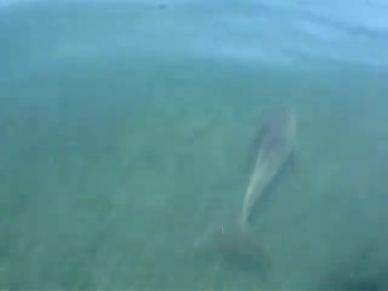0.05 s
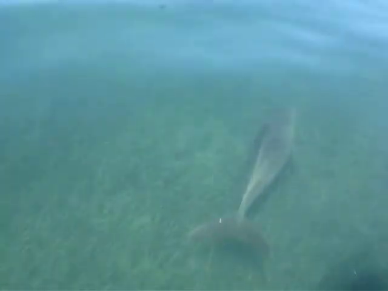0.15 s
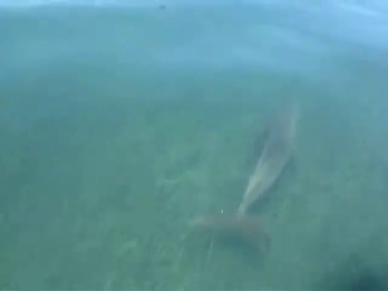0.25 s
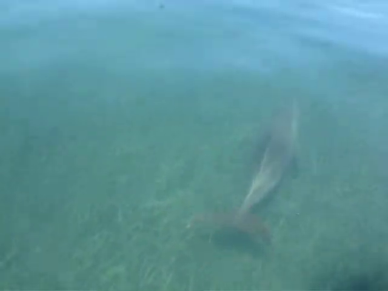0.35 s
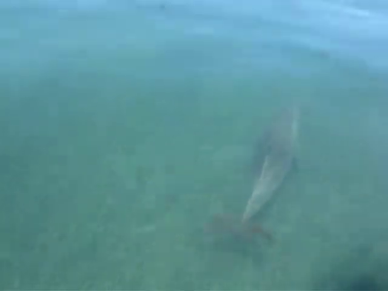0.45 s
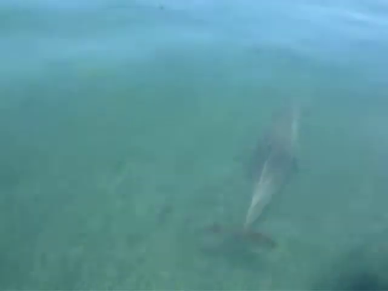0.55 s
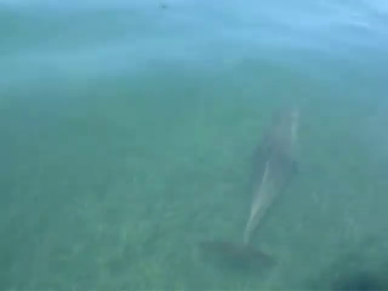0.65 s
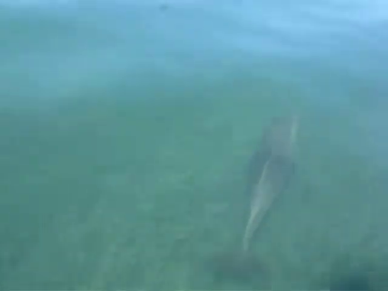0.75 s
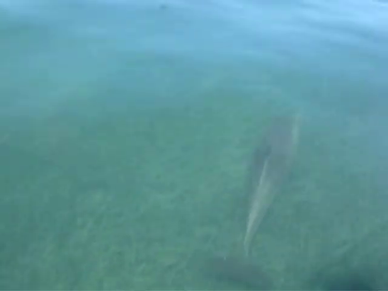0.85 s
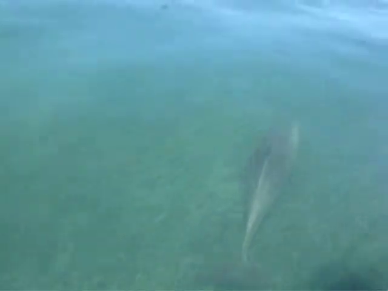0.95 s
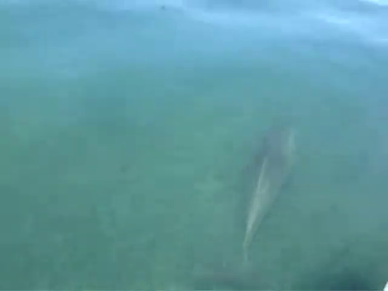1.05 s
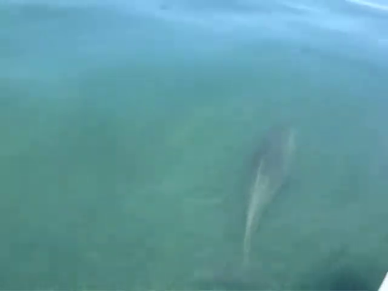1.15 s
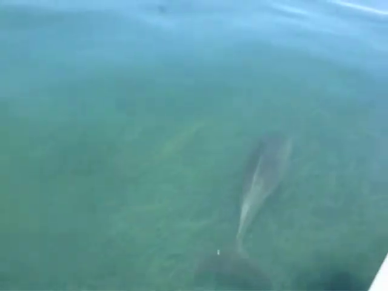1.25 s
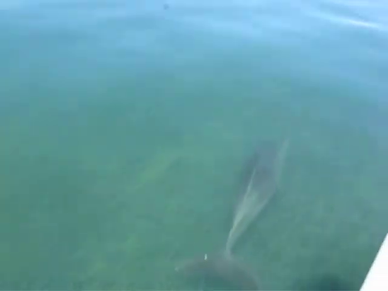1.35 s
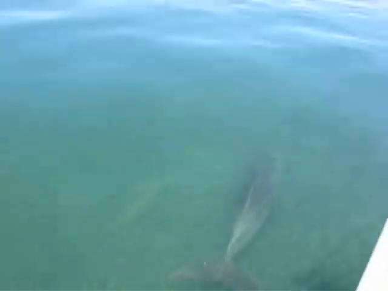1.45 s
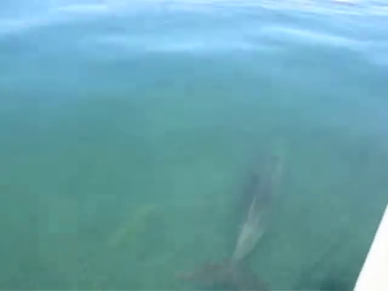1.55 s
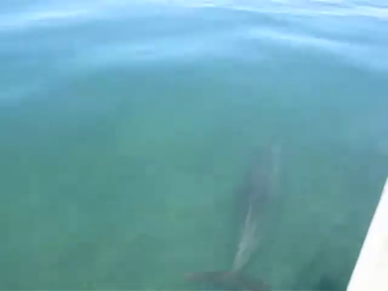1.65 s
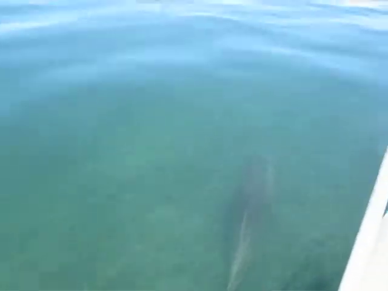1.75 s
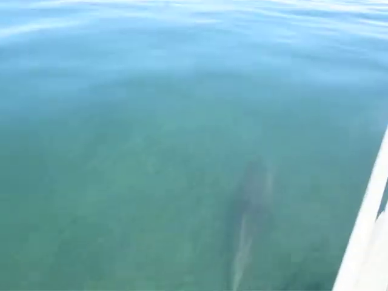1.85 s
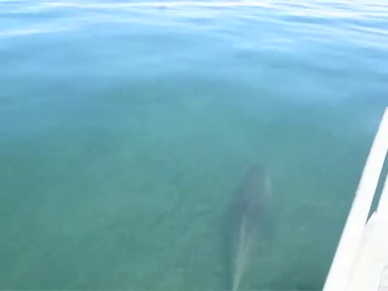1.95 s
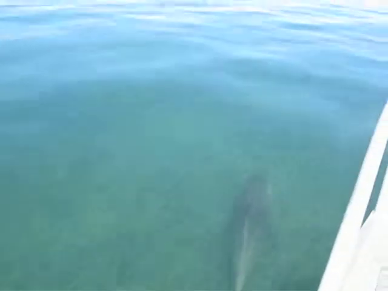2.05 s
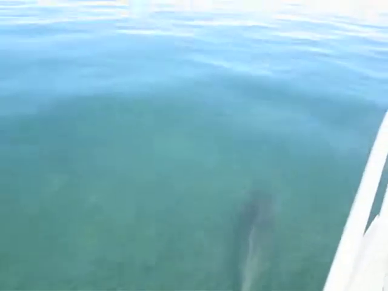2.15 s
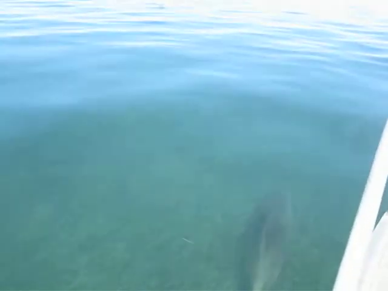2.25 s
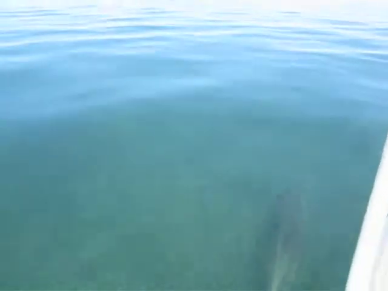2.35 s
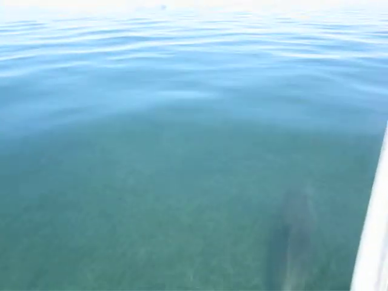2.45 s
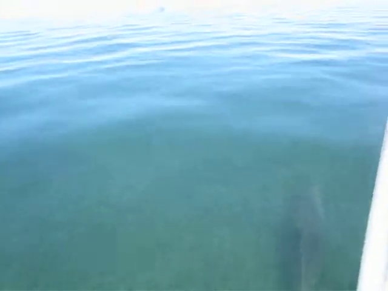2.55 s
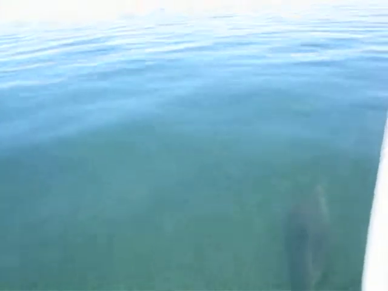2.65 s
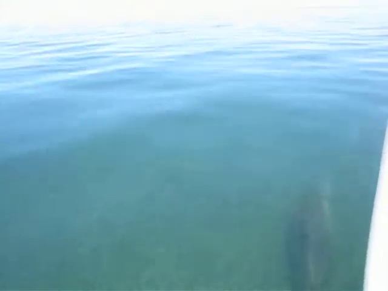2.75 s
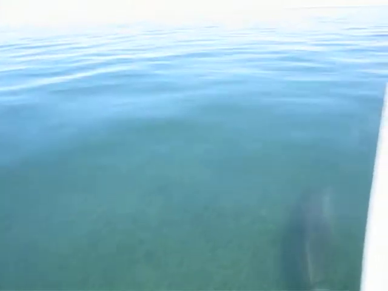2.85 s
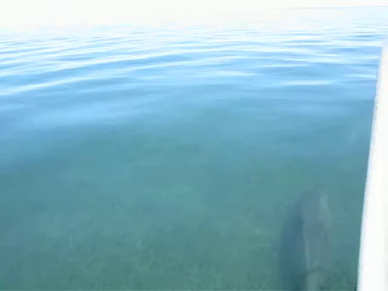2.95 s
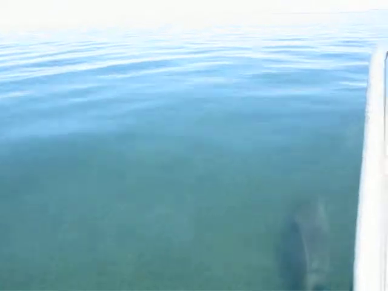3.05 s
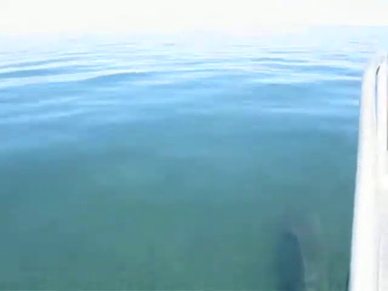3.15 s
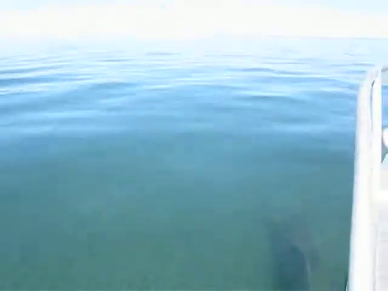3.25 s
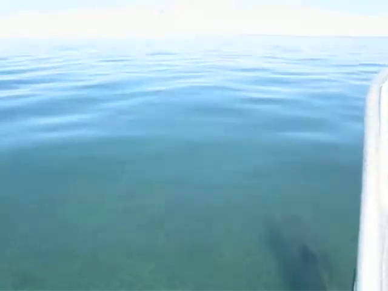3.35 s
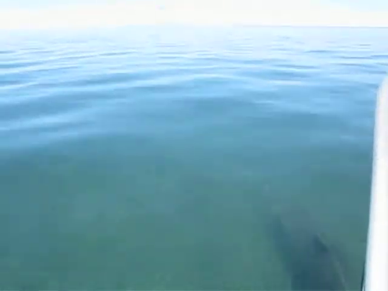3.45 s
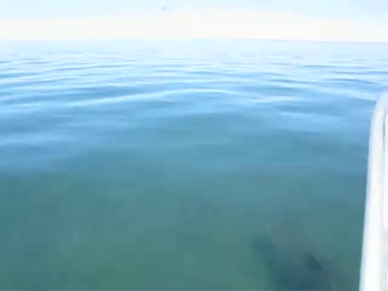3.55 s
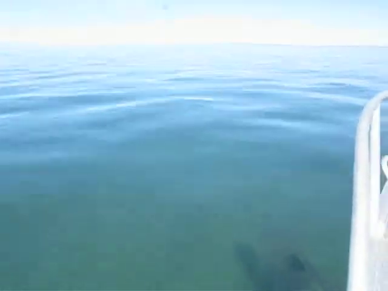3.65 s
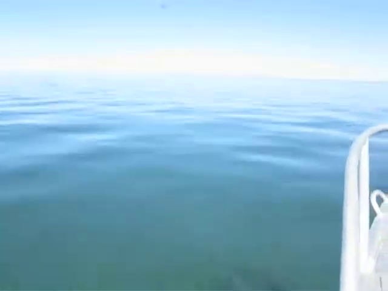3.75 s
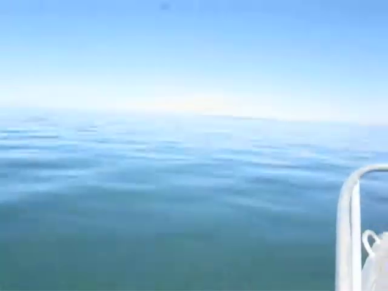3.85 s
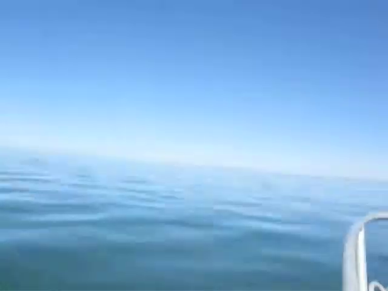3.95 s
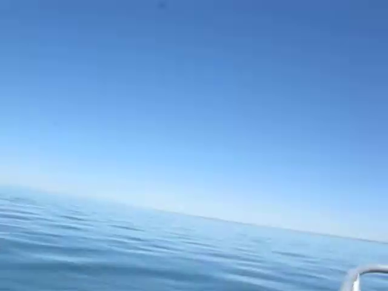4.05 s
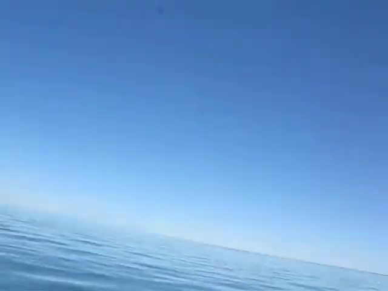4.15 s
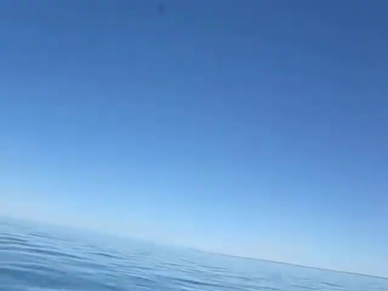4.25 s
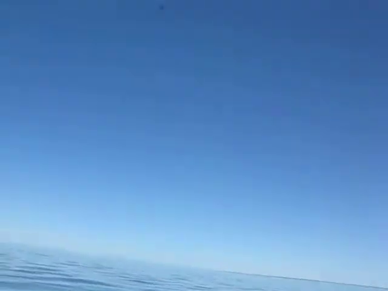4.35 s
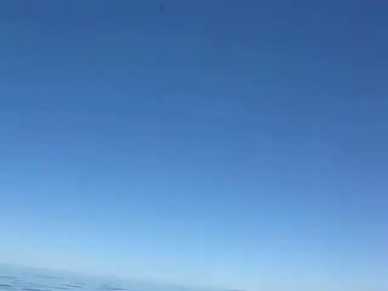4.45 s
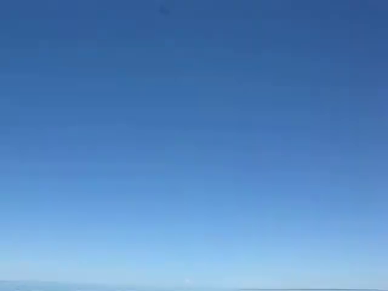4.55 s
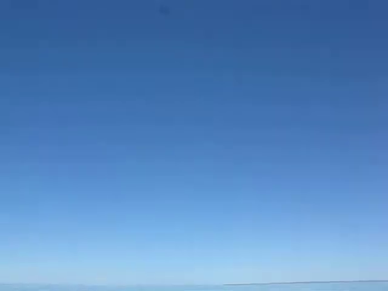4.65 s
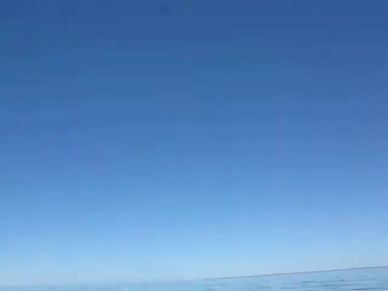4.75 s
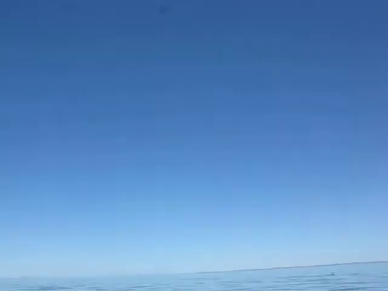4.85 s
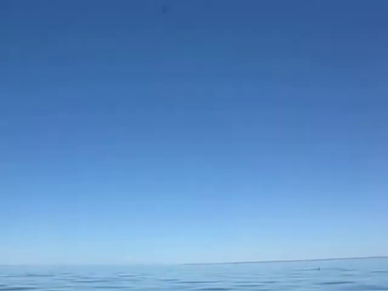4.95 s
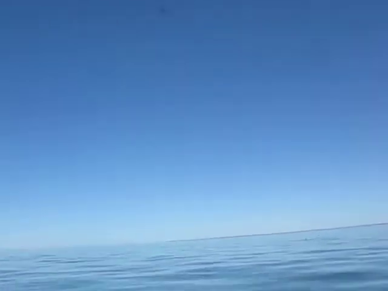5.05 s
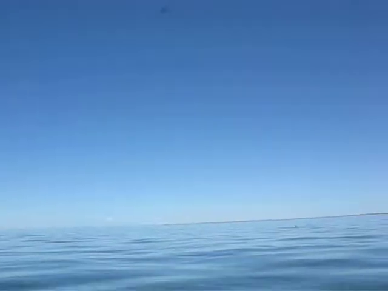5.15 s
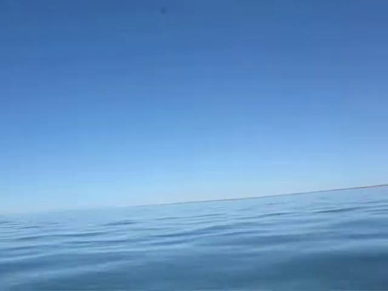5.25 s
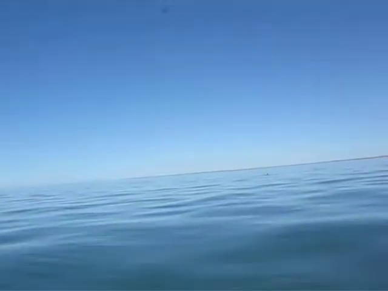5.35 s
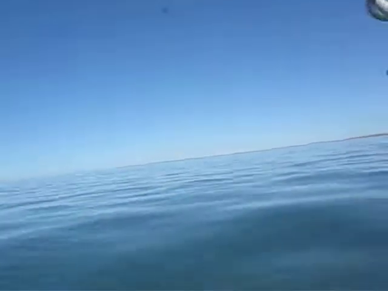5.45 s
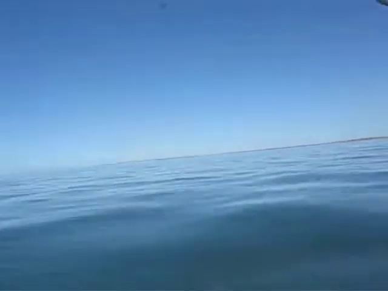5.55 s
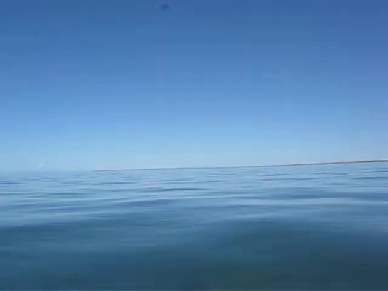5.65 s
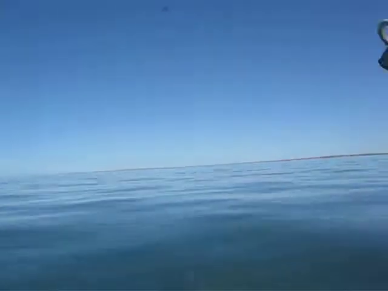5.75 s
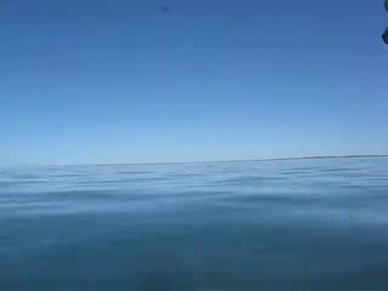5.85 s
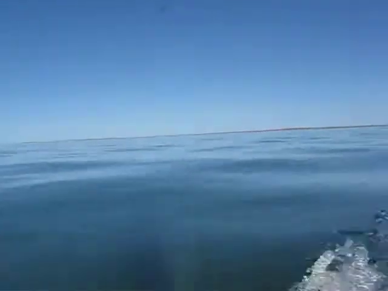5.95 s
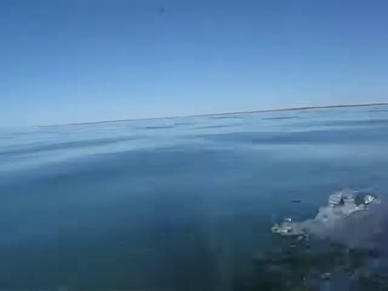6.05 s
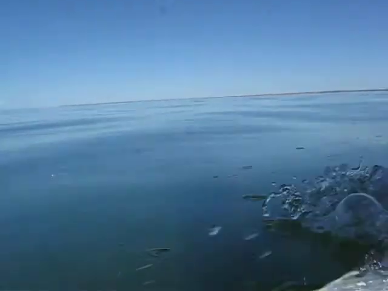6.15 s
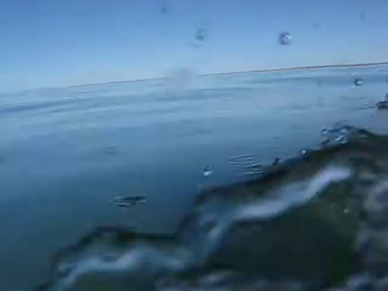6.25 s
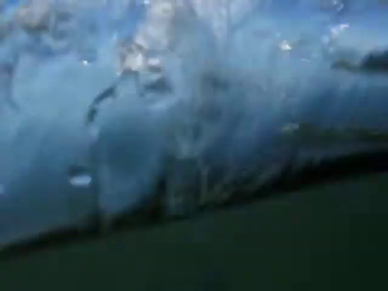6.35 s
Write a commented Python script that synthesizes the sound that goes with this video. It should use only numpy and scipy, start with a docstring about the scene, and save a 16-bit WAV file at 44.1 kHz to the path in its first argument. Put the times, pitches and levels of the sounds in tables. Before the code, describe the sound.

Quiet hull wash gradually grows while fingers tap and rub a hollow plastic case, until water smacks it and bubbling spray hisses over.

```python
"""Camera lowered from a boat into the sea

A small camera in a hard plastic housing nears the sea beside a slowly moving boat, and the hull wash grows.
Fingers knock and rub the housing; then a wave slaps it and spray rushes over it.
Wash, spray, knocks and rubs are noise that shakes the resonant housing; spot rings, squeaks, bubbles,
the slap and its push, jolts and a low rumble reach the microphone directly."""
import sys
import numpy as np
from scipy import signal
from scipy.io import wavfile

SR = 44100
rng = np.random.default_rng(int(sys.argv[2]) if len(sys.argv) > 2 else 0)


def int16_out(signal):
    """Quantize to a 16-bit WAV file."""
    q = np.round(np.clip(np.atleast_2d(signal).T, -1, 1) * 32767)
    wavfile.write(sys.argv[1], SR, q.astype(np.int16))


N = 282681

# The wave slaps the shell. One row: start in seconds, first pitch in Hz, last pitch in Hz, glide time in
# seconds, level in dB, time to fade by 60 dB in seconds, tail level in dB, tail 60 dB fade in seconds.
SLAP = (6.0777, 2050, 670, .004, 10, .011, -18, .07)


def wash():
    """Hull water hisses with droplets, swelling in all four ranges together and in each alone."""
    # The wave covers the microphone port. One row: start in seconds, end in seconds, then the change in dB
    # of the low, middle, upper and top range.
    covered = (6.083, 6.17, -6, -9, -12, -14)
    start, end = covered[:2]
    t = np.arange(N) / SR
    cover = np.clip(np.minimum((t - start) / .002, (end - t) / .04), 0, 1)
    shared_swell_db = 0.15 + 1.0 * drift(4.7) + drift(49)
    own_swell_db = np.array([spread_db * drift(37) for spread_db in (0.3, 0.95, 1.2, 1.66)])
    change_db = shared_swell_db + own_swell_db + np.outer(covered[2:], cover)
    hiss = rms_one(rng.standard_normal((4, N)) + 0.2 * grains(600, 7.0))
    return wash_gains() * amp(change_db) * hiss


def wash_gains():
    """Nearer wash is louder but gains less in the bass; returns a gain over time for each range."""
    # Growth of the wash. Each row: time in seconds, level in dB before the colour is added.
    growth = [(0.1, -48), (0.5, -49.5), (1.3, -50.5), (2.4, -48), (3.0, -48), (3.7, -47), (4.0, -45.5),
              (4.17, -41.5), (4.26, -38.5), (4.6, -41.5), (4.8, -42), (5.2, -40), (5.5, -38), (5.9, -38),
              (6.04, -39)]
    # Colour of the far wash. Each entry: level in dB of one range, low to top.
    far_colour = [-2.5, 0, -4.5, -8.5]
    # Change of that colour. Each entry: dB for every dB of growth in one range, low to top.
    colour_shift = [-0.88, 0.061, -0.061, -0.15]
    far_db = -50
    level = np.interp(np.arange(N) / SR, *np.transpose(growth))
    return amp(level + np.c_[far_colour] + np.outer(colour_shift, level - far_db))


def spray():
    """Drops of every size land on their own, so each range has its own patter."""
    patter = []
    for _ in range(4):
        drops = rng.standard_normal(N) + 0.98 * grains(1500, 5.3)
        patter.append(amp(4.9 * drift(99)) * drops)
    return spray_gains() * rms_one(np.array(patter))


def spray_gains():
    """Spray rises fast, then sags overall while the low and upper ranges gain on the others."""
    # Colour of the spray at its start. Each entry: level in dB of one range, low to top.
    first_colour = [-15.5, -1, -5, -7]
    # Change of that colour. Each entry: dB per second in one range, low to top.
    colour_shift = [57, 6, 25, 0.1]
    start_s, rise_s, rise_db = 6.152, 0.016, 41
    level_db, sag_db_per_s = -24.5, 15.5
    age = np.arange(N) / SR - start_s
    level = level_db - rise_db * np.clip(1 - age / rise_s, 0, 1) - sag_db_per_s * age
    return (age > 0) * amp(level + np.c_[first_colour] + np.outer(colour_shift, np.maximum(age, 0)))


def bubbles():
    """Drops and bubbles in the spray ring briefly, at 24 pitches spread over four octaves."""
    pops = spray_gains()[1] * grains(900, 4.6)
    dealt = rng.integers(0, 24, N)  # which pitch each pop gets
    total = 0
    for k, hz in enumerate(np.geomspace(800, 13000, 24)):
        total = total + resonance(pops * (dealt == k) + 1e-18, hz, hz / 20.0)
    return amp(13.5) * total


def slap():
    """A pocket of air trapped by the wave falls in pitch as it opens; a weaker tail rings on."""
    start, first_hz, last_hz, glide, level_db, t60, tail_db, tail_t60 = SLAP
    age = np.maximum(np.arange(N) / SR - start, 0)
    # adding up the falling pitch over time gives the turns of the wave
    turns = last_hz * age + (first_hz - last_hz) * glide * (1 - np.exp(-age / glide))
    loudness = amp(level_db - 60 * age / t60) + amp(tail_db - 60 * age / tail_t60)
    return -loudness * np.sin(2 * np.pi * turns)


def push():
    """The slap throws the microphone's membrane to one side, and it creeps back."""
    # One row: delay after the slap in seconds, push length in seconds, push level in dB, level in dB of the
    # lasting offset, settling time in seconds.
    membrane = (.0005, .0016, -2, -41, .05)
    delay, length, push_db, offset_db, settle = membrane
    age = np.maximum(np.arange(N) / SR - SLAP[0] - delay, 0)
    thrown = amp(push_db) * np.sin(np.pi * np.clip(age / length, 0, 1))
    return thrown + amp(offset_db) * (age > 0) * np.exp(-age / settle)


def knocks():
    """A sharp blow and milliseconds of rattle shake the shell; the struck spot rings at its own pitch."""
    # Each row: start in seconds, strength in dB, brightness in dB, time for the rattle to fade by 60 dB in
    # seconds, pitch of the struck spot in Hz, level of its ring in dB.
    contacts = [(1.197, -47.5, 3, .006, 6000, -48), (1.723, -26.5, -16, 0.013, 3320, -28),
                (1.965, -27.5, -18, 0.019, 5630, -29), (2.0094, -12.5, -28, 0.0042, 2300, -11),
                (2.0325, -27.5, -32, 0.005, 1400, -19), (2.102, -40, -10, 0.0083, 2220, -34),
                (2.382, -47.5, 10.5, 0.0096, 4100, -37), (2.99, -49, 4, 0.026, 3270, -48),
                (3.737, -44.5, 8, 0.021, 4100, -38), (3.7827, -33, -21, 0.007, 1480, -28),
                (3.837, -51.5, 15, 0.011, 5900, -44), (4.207, -21.5, -42, 0.015, 1460, -12),
                (4.274, -14, -13.5, 0.033, 3260, -10), (4.2875, -17, -22, .0056, 1460, -10.5),
                (4.326, -8.5, -18.5, 0.012, 1530, -8), (4.355, -25, -10, 0.015, 3300, -28),
                (4.497, -43.5, 11, 0.015, 4700, -33), (5.726, -28, -30, 0.006, 1450, -37),
                (5.9371, -8.5, -25, 0.019, 3500, -13.5), (6.007, -23, -10, 0.023, 1450, -22),
                (6.048, -30, -23, .0056, 1450, -24), (6.078, -6.5, 1.5, 0.0038, 4110, -11),
                (6.132, -45, 2.5, .008, 6040, -48), (6.178, -14.5, -2, 0.0072, 5640, -13),
                (6.296, -29, 5, 0.016, 2960, -22), (6.343, -31, 5, .008, 4700, -18)]
    spot_rise_s, spot_t60_s = .0003, .015
    spared_hz, spared_width_hz = 690, 350
    length = 2000  # samples
    force, spot = np.zeros((4, N + length)), np.zeros(N + length)
    age = np.arange(length) / SR
    for start, strength_db, bright, t60, hz, spot_db in contacts:
        burst = 1.04 * rng.standard_normal(length) * amp(-60 * age / max(t60, .001))
        burst[0] = 6.0  # the blow itself
        low_db = -20.5 - 0.56 * strength_db  # harder knocks carry relatively less bass
        upper_db = 4.5 + 0.55 * bright  # the upper range takes a share of the brightness
        colour = np.array([low_db, 0, upper_db, bright])
        i = round(start * SR)
        force[:, i:i + length] += np.outer(amp(strength_db + colour), burst)
        ring = amp(spot_db - 60 * age / spot_t60_s) * (1 - np.exp(-age / spot_rise_s))
        spot[i:i + length] += ring * np.sin(2 * np.pi * hz * age)
    # the lowest strong mode of the housing is hardly driven by the middle range of a blow
    force[1] = force[1] - resonance(force[1], spared_hz, spared_width_hz)
    return force[:, :N], spot[:N]


def rubs():
    """Skin or water sticks and slips in uneven grains under a rounded stroke; slips also squeak at one pitch."""
    # Each row: start in seconds, length in seconds, strength in dB, brightness in dB, squeak pitch in Hz,
    # squeak strength in dB.
    strokes = [(1.48, 0.051, -45, -17, 700, -45), (1.554, 0.015, -33, -10, 3310, -42),
               (1.566, 0.019, -34, -2.5, 3320, -36), (1.584, 0.023, -35.5, -1, 3340, -31.5),
               (1.573, .036, -50, -2, 5810, -39.5), (1.616, 0.011, -33, -4.5, 5880, -42),
               (1.707, 0.0078, -36, -1, 3300, -38), (1.797, 0.054, -39.5, -23, 1470, -48),
               (3.78, 0.048, -37.5, -8, 1490, -40), (3.87, .11, -47, 8, 1444, -42),
               (4.002, 0.04, -41, -10, 1450, -40.5), (4.028, 0.046, -33, -13, 1390, -33),
               (4.06, .03, -42, -13, 3450, -47), (4.079, 0.019, -40, -10, 1450, -40),
               (4.096, 0.039, -37, 0, 1380, -38), (4.14, .02, -40, -7, 1400, -40),
               (4.322, 0.036, -26, -32, 701, -28), (4.342, 0.036, -23.5, -35, 3290, -31),
               (4.373, 0.038, -23.5, -9.5, 2466, -22.5), (4.385, 0.036, -50, -22, 1317, -15),
               (4.42, 0.061, -43, -15, 1259, -17), (4.426, 0.049, -48, -20, 1448, -20.5),
               (4.43, 0.033, -37, -10, 3204, -31.5), (4.5, 0.088, -36.5, -17, 1340, -38),
               (5.971, 0.041, -33.5, -5, 3750, -37), (6.004, 0.014, -25, -16, 1380, -19.5),
               (6.163, 0.014, -22, -10, 3400, -27), (6.18, 0.015, -31, 1.5, 1446, -27),
               (6.213, .012, -41, 1.5, 5730, -30), (6.229, 0.015, -14, -4.5, 1300, -41),
               (6.254, 0.024, -15, -22, 1580, -27), (6.292, .027, -27, -1, 1585, -22.5),
               (6.318, 0.0173, -22.5, 3, 1037, -18), (6.345, 0.028, -38, -13, 3380, -23.5),
               (6.379, 0.036, -36, -9, 1026, -24)]
    steady_share = 0.54  # steady tone against rough tone in a squeak
    t = np.arange(N) / SR
    stroke, squeak = np.zeros((4, N)), np.zeros(N)
    slips = amp(2.2 * drift(220)) * (0.42 * rng.standard_normal(N) + 0.28 * grains(2000, 3.5))
    waver = 1.24 * drift(74)  # radians
    for start, length, strength_db, bright, hz, squeak_db in strokes:
        shape = np.sin(np.pi * np.clip((t - start) / length, 0, 1)) ** 1.12
        colour = np.array([-6.5, 0, 2 + 0.37 * bright, bright])  # dB, low to top range
        stroke += np.outer(amp(strength_db + colour), shape)
        span = slice(round(start * SR), round((start + length) * SR))
        rough = rms_one(resonance(resonance(slips[span], hz, 236), hz, 236))
        steady = np.sin(2 * np.pi * hz * t[span] + waver[span])
        squeak[span] += amp(squeak_db) * shape[span] * (rough + steady_share * steady)
    return stroke * slips, squeak


def jolts():
    """Dull jolts of the grip shake the whole camera for about three cycles each."""
    # Each row: start in seconds, pitch in Hz, level in dB.
    shakes = [(2.38, 268, -42.5), (3.776, 60.3, -52), (4.026, 317, -37), (4.04, 40, -46),
              (4.125, 70, -43.5), (4.267, 222, -34.5), (4.323, 246, -38), (6.012, 273, -33),
              (6.173, 500, -30), (6.235, 312, -25)]
    cycles = 3.14
    t = np.arange(N) / SR
    total = 0
    for start, hz, level_db in shakes:
        shape = np.sin(np.pi * np.clip((t - start) * hz / cycles, 0, 1))
        total = total + amp(level_db) * shape * np.sin(2 * np.pi * hz * (t - start))
    return total


def rumble():
    """Air and hull rumble: low steady noise built from half-octave bands."""
    # Each row: frequency in Hz, relative level in dB per Hz.
    spectrum = [(15, -47), (25, -6.5), (112, -2), (230, -4.5), (352, -14), (460, -6), (600, -5.5),
                (780, -38), (1320, -120)]
    rms_db = -61.5
    hz, level = np.transpose(spectrum)
    edges = 22 * 2 ** np.arange(0, 5.1, .5)
    total = 0
    for low, high in zip(edges, edges[1:]):
        band = signal.butter(2, [low, high], "band", fs=SR, output="sos")
        noise = signal.sosfilt(band, rng.standard_normal(N))
        middle = np.log(low * high) / 2
        total = total + amp(np.interp(middle, np.log(hz), level)) * noise
    return amp(rms_db) * rms_one(total)


def housing(force):
    """Each row of force shakes one range; white force of rms 1 sounds at about rms 1 there."""
    # Edges of the four ranges in which a contact shakes the housing. Each entry: frequency in Hz.
    range_edges = [150, 800, 2400, 6600, 16500]
    click = np.zeros(8192)
    click[0] = 1
    modes = ringing(click)
    total = 0
    for k, (low, high) in enumerate(zip(range_edges, range_edges[1:])):
        band = signal.butter(3, [low, high], "band", fs=SR, output="sos")
        gain = np.sqrt(np.sum(signal.sosfilt(band, modes) ** 2))
        total = total + signal.sosfilt(band, force[k]) / gain
    return ringing(total)


def ringing(x):
    """The housing's resonances ring side by side, with alternating signs."""
    # Each row: frequency in Hz, width in Hz, level in dB.
    shell_modes = [(330, 170, -14.0), (690, 60, 0.0), (840, 310, -9.5), (1250, 120, -2.0),
                   (1470, 180, -3.0), (1820, 280, -7.0), (2120, 250, -7.5), (2720, 310, -10.5),
                   (3360, 260, -11.0), (4090, 410, -16.0), (4640, 380, -17.0), (6020, 520, -17.5),
                   (7240, 260, -15.5), (8440, 1480, -25.0), (10460, 880, -20.5), (12280, 1010, -21.0),
                   (14070, 410, -21.5), (16370, 3150, -32.5)]
    total = 0
    for k, (hz, width, level_db) in enumerate(shell_modes):
        total = total + (-1) ** k * amp(level_db) * resonance(x, hz, width)
    return total


def resonance(x, hz, width):
    """Two-pole resonance with a gain of about 1 at its peak; a wider one dies away sooner."""
    r = np.exp(-np.pi * max(width, 20) / SR)
    return signal.lfilter([(1 - r * r) / 2, 0, (r * r - 1) / 2], [1, -2 * r * np.cos(2 * np.pi * hz / SR), r * r], x)


def grains(per_s, spread_db):
    """Tiny random impacts of uneven size, rms 1."""
    sizes = amp(spread_db * np.minimum(rng.exponential(1, N), 5)) * rng.choice([-1, 1], N)
    return rms_one(sizes * (rng.random(N) < per_s / SR))


def drift(rate):
    """Slow random wander of rms 1: smoothed noise, faster for a higher rate in Hz."""
    r = np.exp(-80 * np.pi * rate / SR)  # one step lasts 40 samples
    slow = signal.lfilter([1], [1, -2 * r, r * r], rng.standard_normal(N // 40 + 2002))[2000:]
    return np.interp(np.arange(N) / 40, np.arange(len(slow)), rms_one(slow))


def rms_one(x):
    """Scale to rms 1."""
    return x / np.sqrt(np.mean(x ** 2) + 1e-20)


def amp(db):
    """Turn dB into a gain."""
    return 10 ** (np.asarray(db) / 20)


def scene():
    """Water, blows and rubbing shake the housing; all other sounds reach the microphone directly."""
    blows, spots = knocks()
    rubbing, squeak = rubs()
    shaken = housing(wash() + spray() + blows + rubbing)
    direct = spots + squeak + bubbles() + slap() + push() + rumble() + jolts()
    return (shaken + direct)[None]


def record(dry):
    """The input stage flattens loud peaks, most of all the slap; then the top is cut."""
    overload, cutoff_hz = .68, 15700
    clipped = dry / (1 + np.abs(dry / overload) ** 6) ** (1 / 6)
    return signal.sosfilt(signal.ellip(10, .5, 60, cutoff_hz, fs=SR, output="sos"), clipped)


dry = scene()
out = record(dry)
int16_out(out)
```